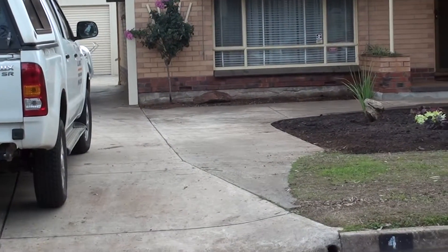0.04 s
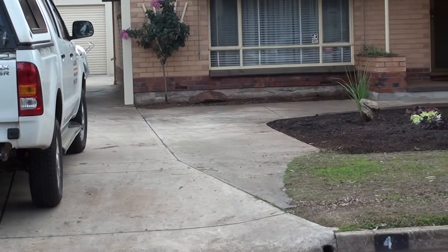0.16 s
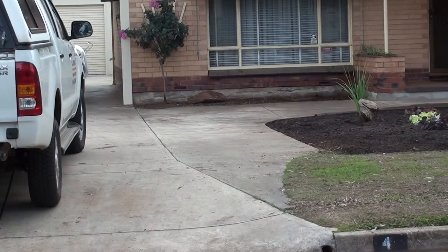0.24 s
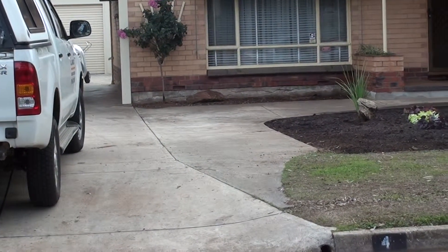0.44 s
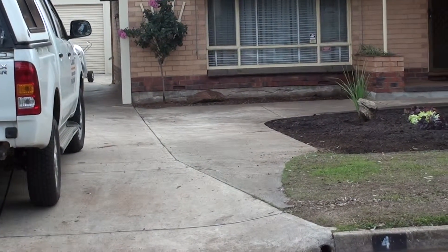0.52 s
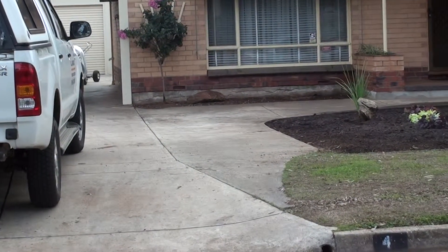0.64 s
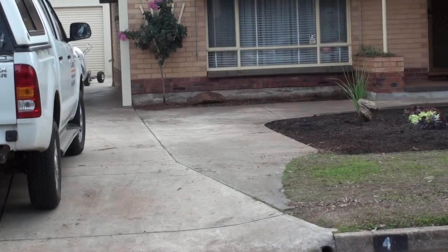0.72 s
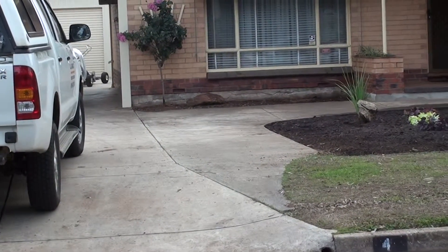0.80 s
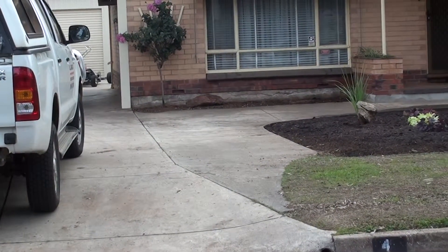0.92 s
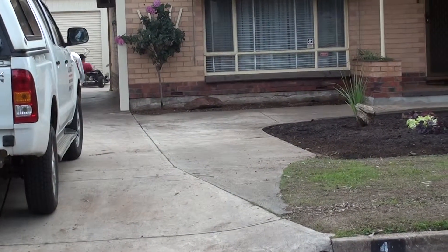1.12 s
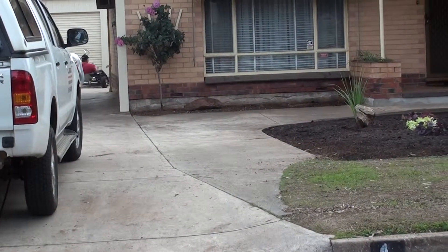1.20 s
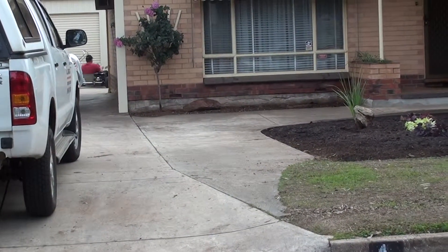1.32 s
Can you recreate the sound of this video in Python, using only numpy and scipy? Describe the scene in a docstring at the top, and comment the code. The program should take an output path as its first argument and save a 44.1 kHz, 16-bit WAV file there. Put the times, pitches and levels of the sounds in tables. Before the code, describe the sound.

Tyres give one short, high, wavering squeal on concrete as a go-kart pulls away. Its small engine putters underneath and pops more sharply near the end, over a low hum and hiss, heard from the far end of a driveway.

```python
"""A driveway between house and garage walls, heard almost in mono from its far end.
A go-kart pulls away behind a parked truck, its small engine puttering over a low wash and a hiss.
Three tyres stick and slip on the concrete in one short chirp, their tones beating against each other.
Each firing cracks and rings the exhaust pipe; the pops turn sharp as the kart crosses an open gap.
The walls throw back the chirp and give both tyres and exhaust a short tail."""
import sys
import numpy as np
from scipy import signal
from scipy.fft import rfft, irfft, next_fast_len
from scipy.io import wavfile
from scipy.ndimage import uniform_filter1d, minimum_filter1d, map_coordinates

SR = 44100
rng = np.random.default_rng(int(sys.argv[2]) if len(sys.argv) > 2 else 0)


def inscribe(sig):
    """Save sig as 16-bit PCM at rate SR to the path in sys.argv[1].

    A 1-D sig is mono; a 2-D sig holds one channel per row.
    Samples are clipped to [-1, 1] before scaling.
    """
    pcm = np.round(np.clip(np.atleast_2d(sig).T, -1, 1) * 32767)
    wavfile.write(sys.argv[1], SR, pcm.astype(np.int16))


N = 59535
TIME_S = np.arange(N) / SR
TYRE_PAN_DB, ENGINE_PAN_DB = .35, -.35  # positive leans left


def amp(db):
    """Decibels to gain."""
    return 10 ** (np.asarray(db) / 20)


def along(points, hz):
    """Read (pitch_hz, value) points on a log frequency axis."""
    point_hz, values = np.transpose(points)
    return np.interp(np.log(hz + 1), np.log(point_hz + 1), values)


def curves(rows):
    """One envelope for each column after the time."""
    times, *columns = np.transpose(rows)
    return [np.interp(TIME_S, times, column) for column in columns]


def wobble(per_s):
    """A smooth random curve with per_s knots a second."""
    return map_coordinates(rng.standard_normal(N // 8), [TIME_S * per_s], mode="wrap")


def filtered(x, response):
    """Equalise x with a gain that is a function of frequency."""
    size = next_fast_len(N + SR // 2)
    return irfft(rfft(x, size) * response(np.fft.rfftfreq(size, 1 / SR)), size)[..., :N]


def noise(spectrum):
    """Coloured noise of rms 1."""
    x = filtered(rng.standard_normal(N), lambda hz: amp(along(spectrum, hz)))
    return x / np.sqrt(np.mean(x ** 2) + 1e-20)


def spread(mid, side):
    """A narrow stereo image: the side signal stays well under the middle."""
    # stereo width: frequency_hz, side_gain_db
    width = [(50, -14), (250, -21), (600, -16.5), (2000, -10), (4000, -20.5), (8500, -19), (10000, -52)]
    difference = filtered(side, lambda hz: amp(along(width, hz)))
    return np.array([mid + difference, mid - difference])


def pan(db):
    """Left and right gains; positive leans left."""
    return amp([[db], [-db]])


def yard(x, wet_db, build_s=.016):
    """Direct sound plus the diffuse tail that builds between the walls."""
    # reverb decay: frequency_hz, t60_s
    decay = [(150, 0.33), (2000, 0.83), (4000, 1), (10000, 0.44)]
    hz, t, grains = signal.stft(rng.standard_normal((2, SR)), SR, nperseg=256)
    shape = amp(-60 * t / along(decay, hz)[:, None]) * (1 - np.exp(-t / build_s))
    shape /= np.sqrt(np.mean(shape ** 2, axis=1, keepdims=True) * SR)
    tail = signal.istft(grains * shape, SR, nperseg=256)[1]
    mid, side = signal.fftconvolve(x[None], tail, axes=1)[:, :N]
    return x + amp(wet_db) * spread(mid, side)


def engine_wash():
    """The low, steady bed of engine and street noise."""
    # wash colour: frequency_hz, density_db
    colour = [(25, -11), (50, -25), (80, -21), (115, -8.5), (165, 1.5), (240, -6.5), (330, -10), (450, -15),
              (700, -11), (1100, -20.5), (2000, -38), (5000, -43)]
    # wash envelope: time_s, level_db
    envelope = [(0, -35.5), (.2, -33.5), (.33, -33.5), (.5, -34.5), (.8, -35), (.93, -33), (1.15, -34),
                (1.35, -34)]
    return amp(curves(envelope)[0]) * spread(noise(colour), noise(colour))


def kart_hiss(lift_db=2, flicker_db=1.18):
    """The running kart hisses; the treble flickers slightly."""
    # hiss colour: frequency_hz, density_db
    colour = [(600, -7), (1400, 2), (2600, 0), (3800, -2), (5400, 1.5), (6300, -0.5), (8000, 0),
              (9500, -9.5), (12000, -21), (15500, -42)]
    # hiss envelope: time_s, relative_db
    envelope = [(0.0, -34.5), (0.514, -35), (0.748, -37.5), (0.95, -38.5), (1.1, -34), (1.35, -39)]
    level_db = curves(envelope)[0] + lift_db + flicker_db * wobble(per_s=89.8)
    return amp(level_db) * spread(noise(colour), noise(colour))


def exhaust():
    """Each firing lets out a crack of gas and rings the pipe; weaker, screened cracks are duller."""
    # engine firings: start_s, thump_db, crack_db
    firings = [(.002, -28, -24.5), (0.059, -24.5, -26.5), (.133, -30, -36), (0.201, -21, -42),
               (.266, -22, -39), (.335, -25, -24), (.394, -23, -24.5), (.455, -19, -24.5), (.510, -19, -21),
               (.563, -19.5, -46), (0.616, -29, -25.5), (.675, -21.5, -31), (.735, -21.5, -28.5),
               (.790, -31, -53), (0.858, -21, -53), (0.919, -30, -43), (.976, -19.5, -26.5),
               (1.0308, -16, -17.5), (1.0843, -15, -17.5), (1.136, -19, -17), (1.186, -17.5, -24.5),
               (1.239, -25, -24), (1.297, -55, -77)]
    # exhaust pipe modes: pitch_hz, relative_db, t60_s
    pipe_modes = [(144, -2, 0.072), (111, -7, 0.11), (230, -16, .04), (692, -9.5, .025)]
    # colour of the gas burst: frequency_hz, density_db
    gas_colour = [(150, -5), (650, 6.5), (1300, -4), (1600, -3.5), (2000, 8), (2350, 0.5), (2700, 6.5),
                  (3600, -2.5), (4800, -0.5), (8300, -2.5), (11000, -17), (15000, -26)]
    crack_attack_s, crack_t60_s = .00056, .039
    pipe_lag_s, pipe_attack_s = .0021, .002  # the pipe sounds just after the gas bursts out
    dull_hz, dulling = 3500, .6  # the bright part loses 0.6 dB more per dB of weaker crack
    gas = noise(gas_colour)
    dull = filtered(gas, lambda hz: 1 / (1 + (hz / dull_hz) ** 2) ** .5)
    open_db = max(crack_db for _, _, crack_db in firings)
    pops = np.zeros(N)
    for start_s, thump_db, crack_db in firings:
        t = np.maximum(TIME_S - start_s, 0)
        puff = dull + (gas - dull) * amp(dulling * (crack_db - open_db))
        pops += puff * amp(crack_db - 60 * t / crack_t60_s) * (1 - np.exp(-t / crack_attack_s))
        t = np.maximum(t - pipe_lag_s, 0)
        ring = sum(amp(db - 60 * t / t60) * np.sin(2 * np.pi * hz * t) for hz, db, t60 in pipe_modes)
        pops += amp(thump_db) * ring * (1 - np.exp(-t / pipe_attack_s))
    return yard(pops, wet_db=-6.5)


def slip(rows, grip_s=.005):
    """Pitch, gain and octave share of a tyre that lets go, then grips again, each within grip_s."""
    hz, level_db, octave_db = curves(rows)
    start_s, end_s = rows[0][0], rows[-1][0]
    slipping = np.clip(np.minimum(TIME_S - start_s, end_s - TIME_S) / grip_s, 0, 1)
    return hz, amp(level_db) * np.sin(slipping * np.pi / 2) ** 2, amp(octave_db)


def tyre(rows, unevenness=1):
    """Rubber sticks and slips unevenly: a wavering tone with two overtones."""
    # the slip starts clean, then breaks up: time_s, roughness_factor
    break_up = [(.245, .25), (.275, 1.19), (.345, 1.23), (.36, 0.63)]
    jitter, flutter_db = .026, 2.3  # pitch and level waver at a roughness of 1
    third_db = -23  # third harmonic, relative to the octave
    hz, gain, octave = slip(rows)
    roughness = unevenness * curves(break_up)[0]
    wavering_hz = hz * (1 + jitter * roughness * wobble(per_s=520))
    phase = 2 * np.pi * np.cumsum(wavering_hz) / SR
    overtones = np.sin(2 * phase) + amp(third_db) * np.sin(3 * phase)
    flutter = lambda: amp(flutter_db * roughness * wobble(per_s=340))
    return np.sqrt(2) * gain * (flutter() * np.sin(phase) + flutter() * octave * overtones)


def tyre_chirp(scrub_db=-5):
    """Three slipping tyres beat against each other; a rubber scrape follows the trailing one."""
    # slip of the leading, trailing and late tyre: time_s, pitch_hz, level_db, octave_relative_db
    leading = [(.204, 2275, -40, -1), (.219, 2200, -30, -9), (.226, 2100, -13.5, -8), (.24, 2023, -8, -22),
               (.253, 1925, -22, -11), (.264, 1930, -23.5, 4), (.275, 2079, -11.5, -21),
               (.298, 2030, -16.5, -30), (.316, 2022, -11.5, -26), (.334, 2080, -19, -9),
               (.346, 2087, -22, -11), (.356, 2123, -14.5, -19), (.375, 2103, -13, -16),
               (.383, 2104, -27, -24), (.39, 2070, -50, -18)]
    trailing = [(.216, 2250, -36, 0), (.231, 2165, -26.5, 6.5), (.242, 2072, -17.5, 4),
                (.254, 1926, -21, 3), (.266, 1869, -19.5, -6.5), (.278, 1777, -12.5, 1),
                (.292, 1610, -24.5, -8), (.306, 1677, -17.5, -2), (.318, 1728, -32, -25),
                (.336, 1684, -17, -11.5), (.348, 1731, -39, 1), (.368, 1694, -27, 1.5),
                (.39, 1643, -35, 0.5), (.41, 1630, -28.5, 5.5)]
    late = [(.268, 1956, -23, -13), (.282, 1894, -15, -9), (.308, 1918, -32, -8), (.318, 1883, -17.5, 1),
            (.333, 1916, -14.5, -19), (.346, 1938, -13, 0.5), (.36, 1918, -25.5, -7),
            (.375, 1903, -17, -22), (.392, 1844, -22, -8)]
    # colour of scraping rubber: frequency_hz, density_db
    scrub_colour = [(1000, -17.5), (2000, -9), (2600, 6.5), (3000, -1), (4000, 11), (6000, 0), (8000, -6),
                    (12000, -59)]
    tones = tyre(leading) + tyre(trailing, unevenness=.55) + tyre(late)
    _, trailing_gain, _ = slip(trailing)
    chirp = tones + amp(scrub_db) * trailing_gain * noise(scrub_colour)
    return yard(chirp, wet_db=-10) + wall_echoes(chirp)


def wall_echoes(x):
    """Distinct slaps off the house and garage."""
    # wall reflections: delay_s, gain_db
    walls = [(.013, -19), (.027, -16), (.044, -17.5), (.075, -17.5), (.118, -25)]
    return sum(amp(db) * np.pad(x, (int(delay_s * SR), 0))[:N] for delay_s, db in walls)


def scene():
    """Tyres a touch to the left, engine a touch to the right, hiss in the middle."""
    tyres = tyre_chirp() * pan(TYRE_PAN_DB)
    engine_pan = pan(ENGINE_PAN_DB)
    return tyres + exhaust() * engine_pan + kart_hiss() + engine_wash() * engine_pan


def record(dry):
    """The microphone rolls off the deep bass, a limiter holds the peaks and the very top is cut."""
    low_cut_hz, top_hz = 79, 15750
    limit_db, hold_s = -4.3, .012
    lean = signal.sosfilt(signal.butter(2, low_cut_hz, "highpass", fs=SR, output="sos"), dry)
    peak = np.abs(lean).max(axis=0)
    allowed_gain = np.minimum(1, amp(limit_db) / (peak + 1e-9))
    hold = int(hold_s * SR)
    gain = uniform_filter1d(minimum_filter1d(allowed_gain, hold), hold)
    return filtered(lean * gain, lambda hz: hz < top_hz)


dry = scene()
out = record(dry)
inscribe(out)
```